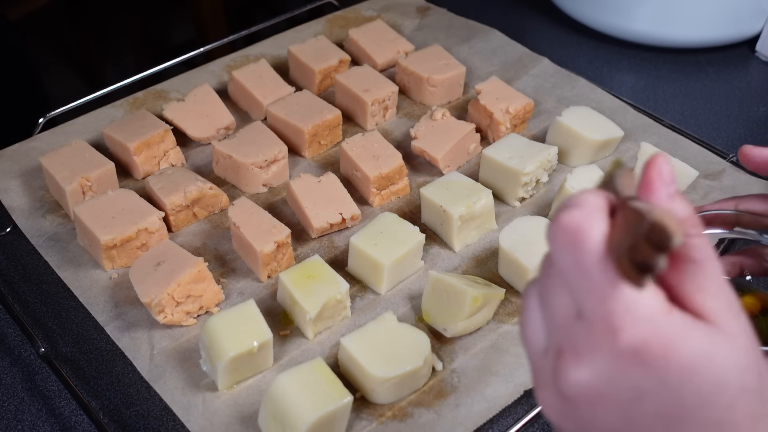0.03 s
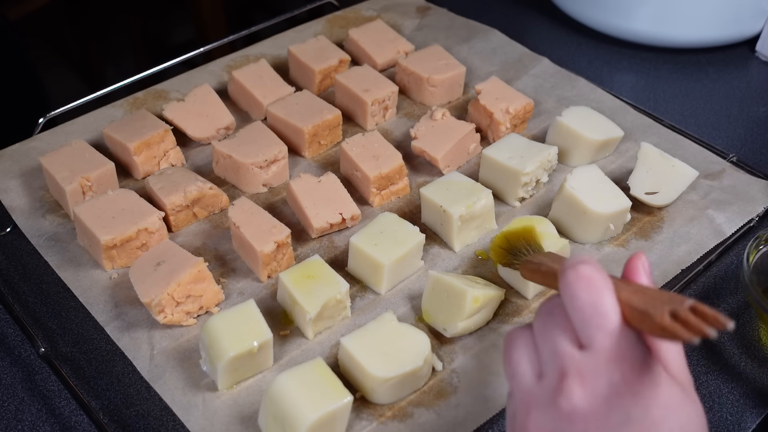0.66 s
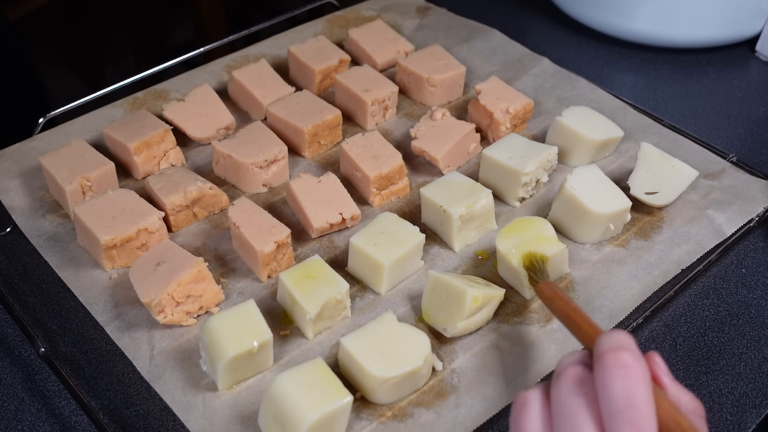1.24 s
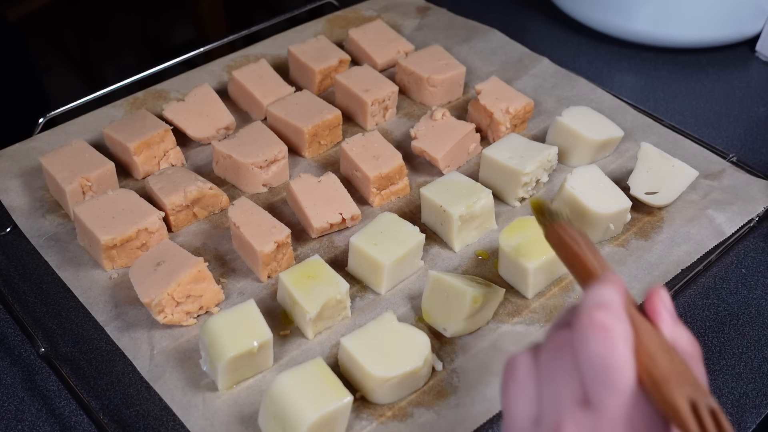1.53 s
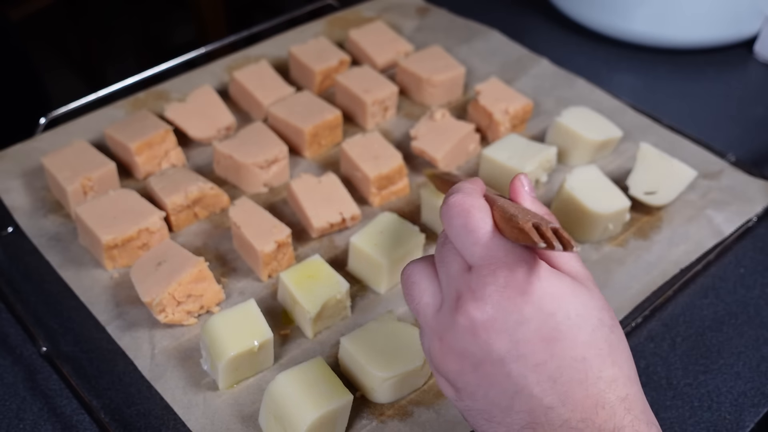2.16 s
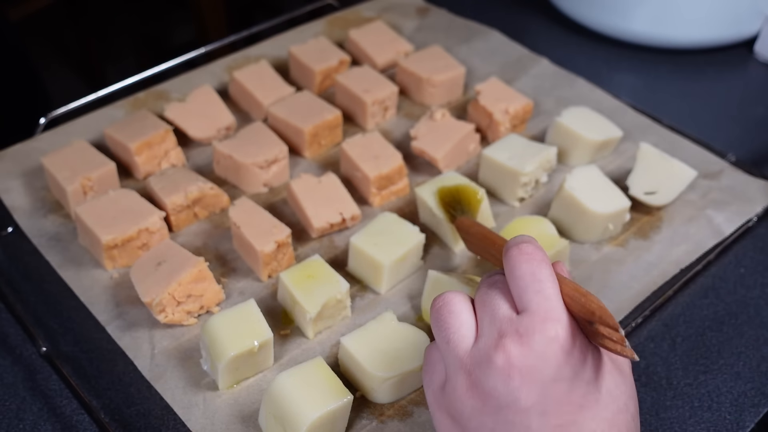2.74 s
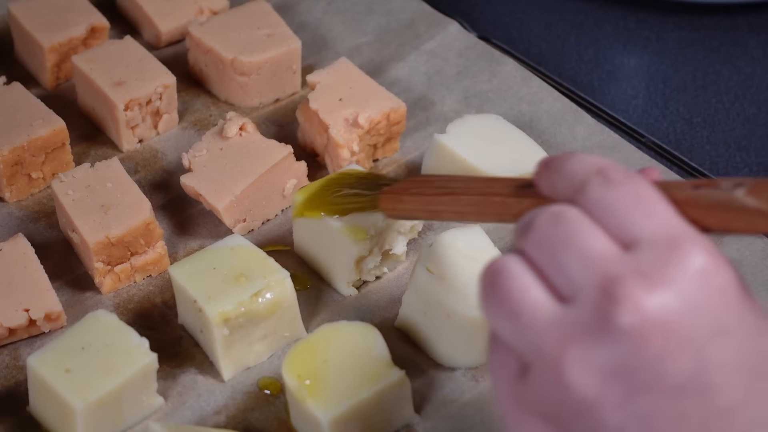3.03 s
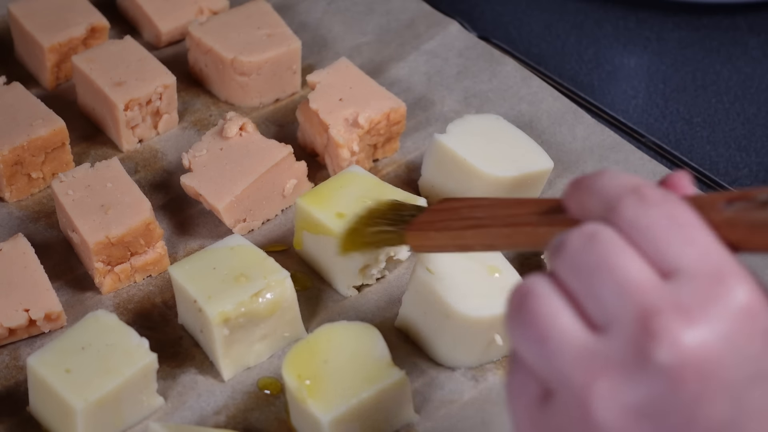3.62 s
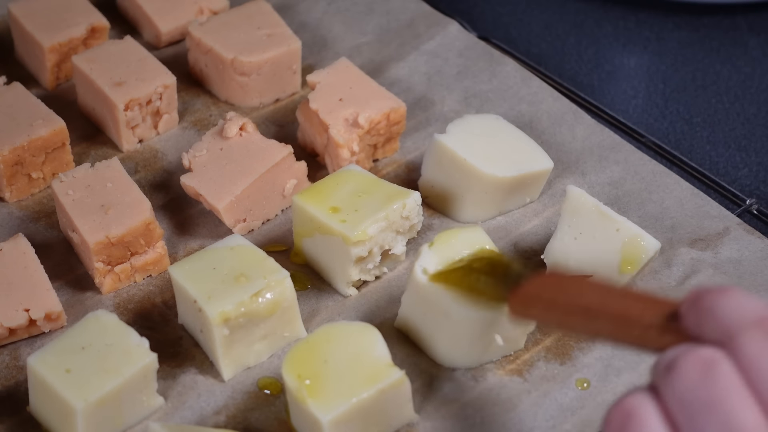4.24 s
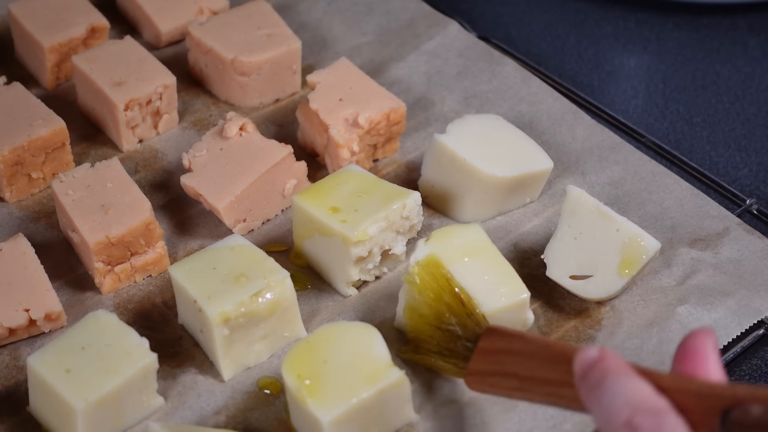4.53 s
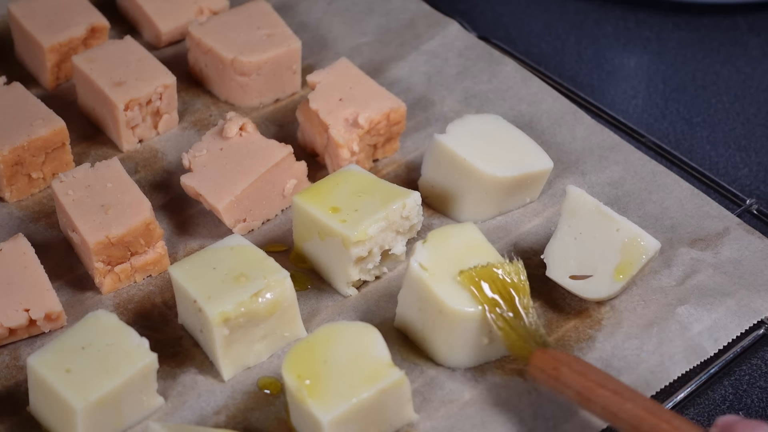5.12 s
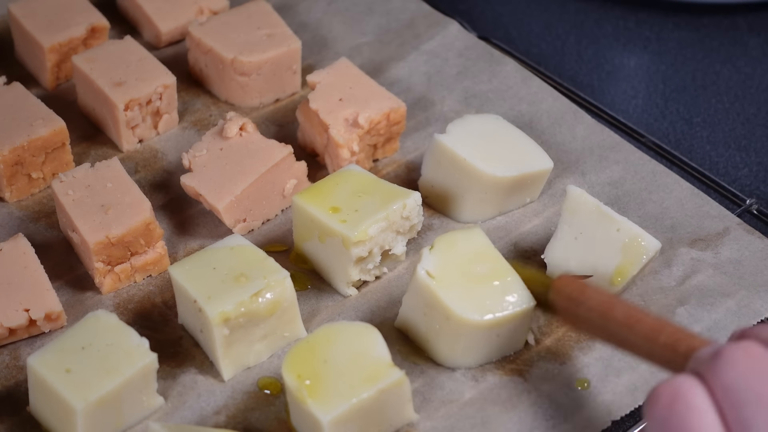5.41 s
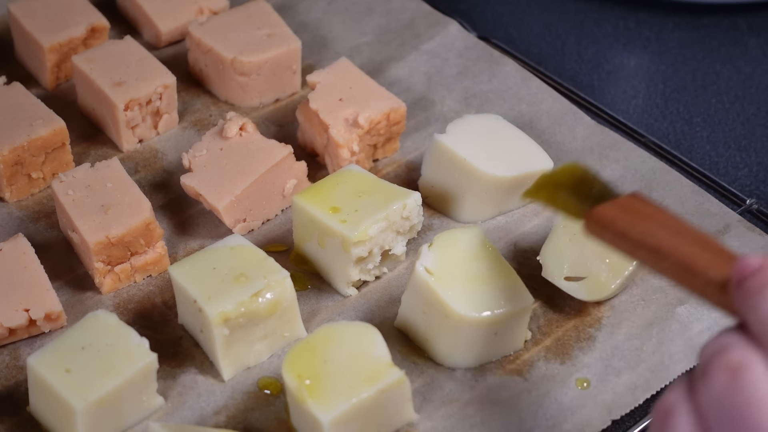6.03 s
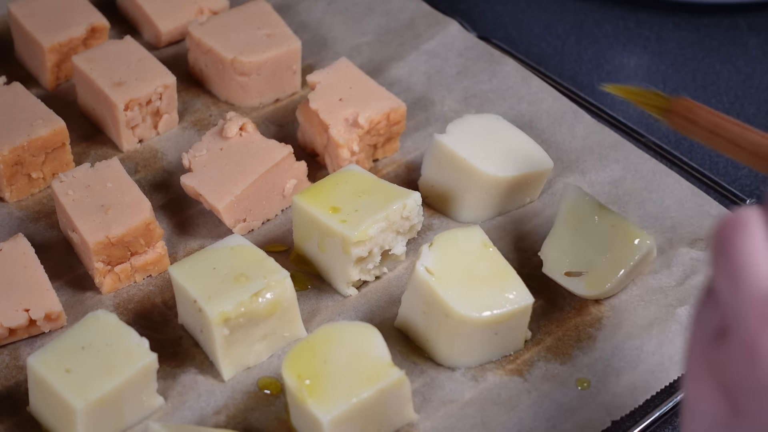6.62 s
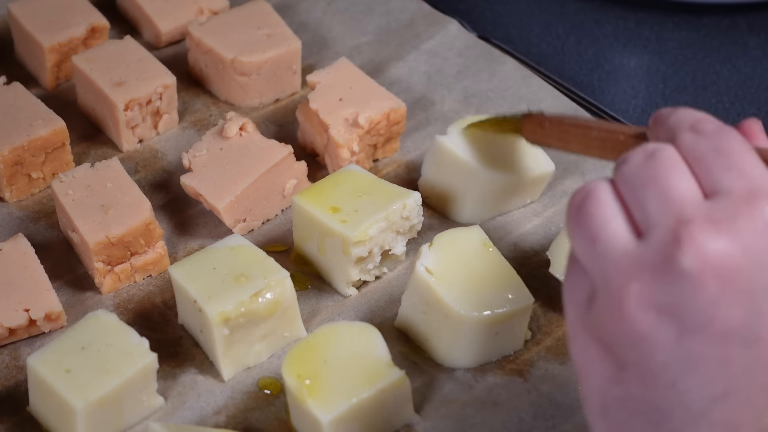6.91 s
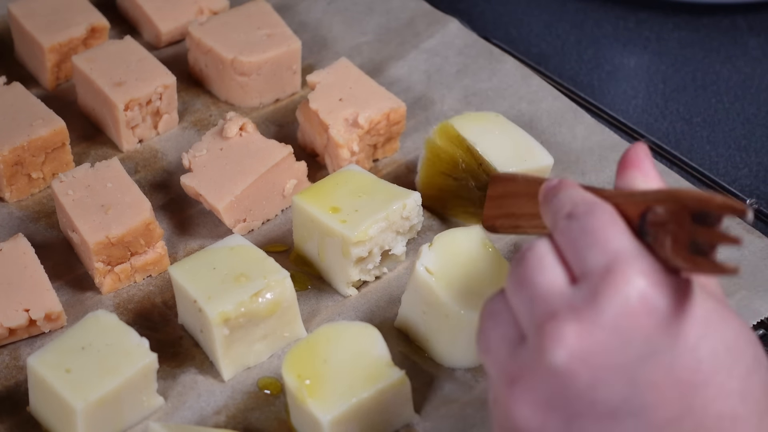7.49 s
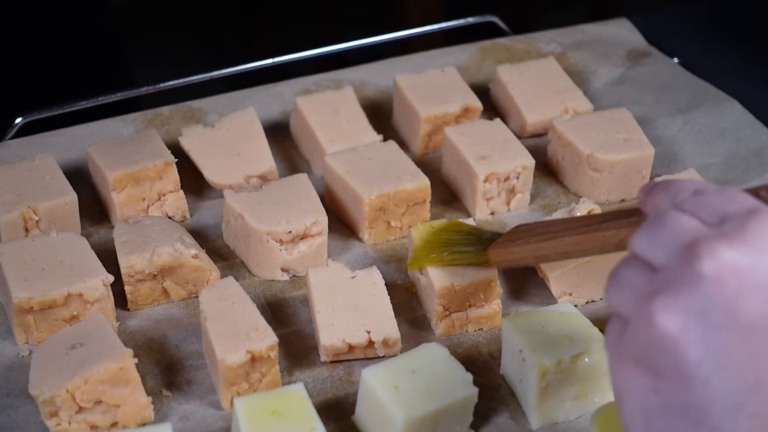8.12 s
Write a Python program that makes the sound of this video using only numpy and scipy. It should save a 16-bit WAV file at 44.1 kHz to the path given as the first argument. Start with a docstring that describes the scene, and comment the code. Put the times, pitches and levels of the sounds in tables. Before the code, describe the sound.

A pastry brush dabs oil onto soft cubes on crinkling baking parchment, after two hollow knocks in a quiet kitchen.

```python
"""Oiling cubes on baking parchment

Close by in a quiet kitchen, a pastry brush dabs oil onto soft cubes, its bristles rustling in short
strokes. The parchment buckles in dry snaps and ticks faintly as it settles. Early on something hollow,
perhaps a drawer, knocks twice and rolls to rest. Worktop and walls answer briefly."""
import sys
import numpy as np
from scipy import signal
from scipy.fft import rfft, irfft, next_fast_len
from scipy.io import wavfile
from scipy.ndimage import map_coordinates

SR = 44100
rng = np.random.default_rng(int(sys.argv[2]) if len(sys.argv) > 2 else 0)


def master_out(mix):
    """Clip the mix to full scale and print it as 16-bit PCM to the path in sys.argv[1]."""
    frames = np.transpose(np.atleast_2d(mix))
    ceiling = np.clip(frames, -1, 1)
    pcm = np.round(ceiling * 32767).astype(np.int16)
    wavfile.write(sys.argv[1], SR, pcm)


N = 368235

# brush strokes: t/s, press/s, drag/s, relative level/dB, firmness/dB (paper rustle over bristle hiss)
STROKES = [(4.548, 0.054, 0.071, -38.5, 0.5), (4.857, 0.016, 0.1, -43.5, -9),
           (5.102, 0.0146, 0.069, -43, -14), (5.345, 0.0084, 0, -37.5, -6),
           (5.364, 0.032, 0.19, -37.5, 4.5), (5.816, 0.017, 0, -46.5, 3), (5.856, .052, 0, -42.5, 10),
           (5.959, .024, .02, -39, 22), (6.218, .015, 0, -47, 4), (6.345, 0.017, 0.044, -49, -4),
           (6.45, 0.032, 0.098, -42, -4.5), (6.824, .075, 0.106, -43, 9.5), (7.057, 0.015, 0, -39.5, 26),
           (7.138, .022, 0.071, -43.5, 18), (7.264, 0.033, 0.023, -39.5, -3.5), (7.542, .04, .06, -44.5, 1),
           (7.9, .03, 0.036, -39, -1)]
# spells in which the oily paper settles: t/s, length/s, relative level/dB
SETTLING = [(0.202, 1.06, -65), (1.9, 0.63, -67), (2.819, 0.14, -64.5), (3.85, 0.32, -67.5),
            (4.245, 3.8, -71), (8.095, 0.24, -69.5)]
# knocks of the drawer, then a soft one on the worktop: t/s, relative level/dB, f/Hz, crack/dB
KNOCKS = [(1.2142, -28, 1030, -9.5), (1.2267, -31.5, 1010, -17), (1.5843, -24.5, 1335, -37),
          (3.1365, -58, 550, -28)]
# tone colours: f/Hz, level/dB
PAPER_EQ = [(60, -71), (200, -48.5), (400, -15.5), (800, -11.5), (1300, -1.5), (2200, 2.5), (3400, -1),
            (4800, -3), (6500, -12.5), (15000, -51.5)]  # crackling parchment
BRISTLE_EQ = [(100, -92), (1500, -14.5), (4000, 2.5), (6000, 0), (10000, -2), (13000, -6.5), (16000, -14.5)]  # bristle hiss
RASP_EQ = [(60, -57), (250, -44), (550, -5.5), (1200, -2), (2200, 4.5), (3200, 3), (4700, -0.5), (6500, -9),
           (15000, -27)]  # bristles rubbing on paper
RATTLE_EQ = [(70, -44), (200, -49), (550, 7), (850, -1), (1050, 3.5), (1450, 5), (1900, -0.5), (2300, -10),
             (2800, -9), (3600, -24.5), (6000, -27), (15000, -62)]  # the drawer's contents


def brush(rise_s=0.0073, release_s=0.015, lift_s=0.0074, sag_db=3, drag_db=-13.5, trim_db=-1):
    """Bristles scrape the paper: each stroke presses hardest as it lands, trails lightly and lifts."""
    out, t = np.zeros(N), np.arange(SR // 4) / SR
    for s, press_s, drag_s, db, firmness_db in STROKES:
        sag = amp(sag_db * (0.5 - 2 * np.minimum(t / press_s, 1)))
        press = held(t, rise_s, press_s, release_s) * sag
        drag = amp(drag_db) * held(t, rise_s, press_s + drag_s, lift_s)
        catching = amp(wobble(per_s=138.6, depth_db=2, size=len(t)))  # tufts catch and slip
        touch = np.maximum(press, drag) * catching
        low_cut_hz = max(570, 960 * 2 ** (-firmness_db / 8))  # a firmer stroke reaches lower
        rasp = coloured(grains(2600, scatter_db=6.5, size=len(t)), RASP_EQ)
        rustle = unit(low_cut(rasp, low_cut_hz))
        hiss = unit(coloured(grains(6000, scatter_db=8.5, size=len(t)), BRISTLE_EQ))
        rustle_db, hiss_db = rustle_and_hiss(db + trim_db, firmness_db)
        add(out, s, touch * (amp(rustle_db) * rustle + amp(hiss_db) * hiss))
    return out


def rustle_and_hiss(db, firmness_db):
    """A stroke's power splits between paper rustle and bristle hiss, both in dB."""
    hiss_db = db - 10 * np.log10(1 + amp(firmness_db) ** 2)
    return hiss_db + firmness_db, hiss_db


def crease(db, hz, treble_db, trim_db=-8.5, crackle_db=-3, size=1024):
    """A crease flips: a patch of the sheet swings for a few cycles, with a crackle and a bright edge."""
    t = np.arange(size) / SR
    onset = 1 - np.exp(-t / 0.00063)
    decay = lambda t60: amp(-60 * t / t60) * onset
    flip = unit(np.sin(2 * np.pi * hz * t) * decay(t60=0.0022))
    patch_eq = np.array(PAPER_EQ) * [hz / 2500, 1]  # a smaller patch crackles higher
    crackle = unit(coloured(rng.standard_normal(size) * decay(t60=0.014), patch_eq))
    edge = unit(coloured(toneless(decay(t60=0.0075)), BRISTLE_EQ))
    body = unit(flip + amp(crackle_db) * crackle)
    return amp(db + trim_db) * low_cut(body + amp(treble_db) * edge, hz=750)


def snaps():
    """The parchment buckles, one dry snap at a time."""
    # creases at set times: t/s, relative level/dB, f/Hz, treble/dB
    buckles = [(0.408, -50.5, 3080, -9.5), (0.4416, -53.5, 1930, -17), (0.5858, -45.5, 2100, -10),
               (0.633, -50.5, 3050, -5.5), (0.7557, -51.5, 2230, -22), (1.0836, -50.5, 2040, -10),
               (1.135, -53.5, 3250, -5), (1.164, -53, 2500, -8), (1.5618, -37.5, 2230, -12.5),
               (1.867, -32.5, 2370, -4), (1.9091, -30.5, 2040, -10), (2.0378, -44.5, 2000, -31),
               (2.11, -42.5, 2960, -17), (2.361, -39.5, 2180, -23), (2.382, -41.5, 1980, -12),
               (3.1369, -52, 1750, -25), (3.6098, -52.5, 3550, -12), (3.9398, -44, 1890, -15),
               (3.9644, -43.5, 2800, -7.5), (4.323, -39.5, 2460, -35), (4.4001, -41.5, 2410, -18),
               (4.6828, -35.5, 2670, 1.5), (5.1071, -40.5, 3280, 1.5), (5.3038, -64.5, 4950, 11),
               (5.3723, -22.5, 3400, -15), (5.4085, -34.5, 2270, -8.5), (5.4688, -24.5, 2810, -9.5),
               (5.8301, -36, 2680, -3.5), (5.8568, -34.5, 2940, -12), (5.8876, -33.5, 2400, -13),
               (5.896, -35.5, 2250, 0.5), (5.946, -31.5, 2630, -4.5), (5.963, -31, 4600, 0),
               (5.9931, -36, 2440, -22), (6.0722, -42, 2550, -36), (6.2271, -42.5, 2800, -12),
               (6.3115, -44.5, 2320, -37), (6.367, -46.5, 2080, -24), (6.4422, -44.5, 2260, -11),
               (6.8279, -29.5, 2830, -7.5), (6.8484, -33, 1830, -17), (6.8879, -34.5, 1970, -29),
               (6.925, -28.5, 2240, -7.5), (6.9756, -34.5, 2450, -4.5), (7.025, -37.5, 2660, -8),
               (7.065, -31.5, 2480, -13), (7.0933, -35.5, 2270, -15), (7.1375, -32, 2260, -13.5),
               (7.147, -33.5, 3320, -18), (7.1574, -38.5, 2670, 0), (7.1977, -39.5, 3200, -9),
               (7.308, -34, 2450, -13), (7.39, -35, 2320, -15), (7.622, -35, 2040, -12),
               (7.663, -40.5, 2560, -3.5), (7.6943, -41.5, 3400, -5.5), (8.2339, -58, 3470, 5.5)]
    out = np.zeros(N)
    for s, db, hz, treble_db in buckles:
        add(out, s, crease(db, hz, treble_db))
    return out


def random_creases(crinkles_per_s=35, pops_per_s=8, scatter_db=5, centre_hz=2400, octaves=0.48):
    """Further creases flip at random times: crinkles under each press, pops while the paper settles."""
    crinkles = [(s, press_s, rustle_and_hiss(db, firmness_db)[0] + 1, crinkles_per_s)
                for s, press_s, _, db, firmness_db in STROKES]
    pops = [(s, length_s, db + 7.5, pops_per_s) for s, length_s, db in SETTLING]
    out = np.zeros(N)
    for s, length_s, db, per_s in crinkles + pops:
        count = round(length_s * per_s)
        for k, (jitter, softness, pitch) in enumerate(rng.uniform(-1, 1, (count, 3))):
            sound = crease(db - scatter_db * softness, centre_hz * 2 ** (octaves * pitch), treble_db=-4)
            add(out, s + length_s * (k + (1 + jitter) / 2) / count, sound)
    return out


def ticks(trim_db=-3, rise_s=0.05, release_s=0.04):
    """The oily paper keeps settling in faint ticks."""
    t = np.arange(N) / SR
    stir = sum(amp(db) * held(t - s, rise_s, length_s, release_s) for s, length_s, db in SETTLING)
    return amp(trim_db) * stir * unit(coloured(grains(75, scatter_db=4), PAPER_EQ))


def drawer(start_s=1.214, slows_s=1.463, rest_s=1.8, gather_db_per_s=19, slowing_db_per_s=32):
    """Rollers rumble over bumps and the runner rings; knocks add to the box's boom and the rattle."""
    # rumble of the rollers: f/Hz, level/dB
    rumble_eq = [(60, -61), (140, -48), (200, -15), (300, -5), (380, -2.5), (440, 3.5), (520, -3.5),
                 (800, -8.5), (3000, -41.5)]
    # resonances of the box panels and the steel runner: f/Hz, width/Hz, level/dB
    panel_modes = [(436, 27, -17), (586, 63, 0.5), (636, 44, 3.5), (722, 19, 0), (803, 24, -8),
                   (823, 140, -14.5)]
    runner_modes = [(5330, 250, -23), (9800, 79, -20), (14600, 150, -43)]
    # the bumps that drive the panels: f/Hz, level/dB
    drive_eq = [(100, -30), (450, -13.5), (850, 2.0), (2500, -13.5)]
    t = np.arange(N) / SR
    moving = held(t - start_s, rise_s=0.0021, hold_s=rest_s - start_s, release_s=0.038)
    speed_db = np.minimum(gather_db_per_s * (t - slows_s), slowing_db_per_s * (slows_s - t))
    rolling = amp(speed_db + wobble(per_s=35, depth_db=2.5))  # the rollers run unevenly
    boom = np.hypot(amp(-50), amp(-10.5) * shaking(t, db_per_s=92))
    jostle = np.hypot(amp(-54) * rolling, amp(-11) * shaking(t, db_per_s=118))
    bumps = lambda eq: unit(coloured(grains(2500, scatter_db=5), eq))
    rumble = amp(-45.5) * rolling * bumps(rumble_eq)
    panels = boom * resonant(bumps(drive_eq), panel_modes)
    rattle = jostle * bumps(RATTLE_EQ)
    ring = amp(-72) * resonant(grains(440, scatter_db=6), runner_modes)
    return low_cut(moving * (rumble + panels + rattle + ring), hz=195)


def knocks(contact_s=0.00064, clatter_db=-5, trim_db=-10):
    """Each hollow knock is a short push on the box, a clatter and a thin crack."""
    out, t = np.zeros(N), np.arange(SR // 20) / SR
    burst = lambda eq, t60: unit(coloured(rng.standard_normal(len(t)) * amp(-60 * t / t60), eq))
    for s, db, hz, crack_db in KNOCKS:
        push = unit(np.sin(2 * np.pi * hz * t) * t ** 2 * np.exp(-t / contact_s))
        clatter = amp(clatter_db) * burst(RATTLE_EQ, t60=0.083)
        crack = amp(crack_db) * burst(RASP_EQ, t60=0.015)
        add(out, s, amp(db + trim_db) * (push + clatter + crack))
    return low_cut(out, hz=260)


def shaking(t, db_per_s):
    """Every knock shakes the drawer in proportion to its strength; the shaking dies away."""
    return np.sqrt(sum((t > s) * amp(db - db_per_s * np.abs(t - s)) ** 2 for s, db, *_ in KNOCKS))


def thud(gain_db=-53, top_hz=130):
    """The cabinet takes up each knock as a faint low thud."""
    lows = filtered(rng.standard_normal(N), lambda hz: 1 / (1 + (hz / top_hz) ** 4))
    return amp(gain_db) * shaking(np.arange(N) / SR, db_per_s=110) * unit(low_cut(lows, hz=60))


def kitchen(x, wet_db, worktop_s=0.0061, worktop_db=-15, size=16384):
    """The worktop throws back one quick reflection; the walls add a short tail that keeps shifting."""
    # decay of the room: f/Hz, t60/s
    decay_times = [(300, 0.63), (1000, 0.6), (2800, .46), (7000, 0.61), (15000, 0.36)]
    # stereo image of the tail: f/Hz, left-right likeness
    likeness = [(300, 0.98), (1000, 0.69), (3000, 0.55), (10000, 0.4)]
    near = x.copy()
    add(near, worktop_s, amp(worktop_db) * x)
    walls = np.zeros((2, N))
    for start in range(0, N, size // 2):
        piece = x[start:start + size]
        piece = piece * np.sin(np.pi * np.arange(len(piece)) / size)  # crossfade into a fresh tail
        hz, t, noise = signal.stft(rng.standard_normal((2, SR // 3)), SR, nperseg=256)
        decay = amp(-60 * t / along(decay_times, hz)[:, None])
        onset = np.minimum(t / 0.0017, 1)
        tail = signal.istft(noise * decay * onset, SR, nperseg=256)[1]
        reverb = signal.fftconvolve(piece[None], tail / np.linalg.norm(tail[0]), axes=1)
        for side, sound in zip(walls, reverb):
            add(side, start / SR, sound)
    return near + amp(wet_db) * spread(walls, likeness)


def room_tone(level_db=-62.5):
    """The steady hush of the still kitchen."""
    # colour of the hush: f/Hz, relative level/dB
    hush_eq = [(25, -38), (48, -21), (75, -29.5), (120, -20.5), (180, -14), (260, -18.5), (450, -9.5),
               (750, -2.5), (1150, -7.5), (1700, -4.5), (3000, -8), (5000, -11.5), (8000, -16.5),
               (16000, -20.5)]
    # its stereo image: f/Hz, left-right likeness
    likeness = [(60, 0.96), (180, 0.81), (550, 0.3), (1650, 0.019), (4970, 0.062), (15000, 0.61)]
    noise = filtered(rng.standard_normal((2, N)), lambda hz: amp(along(hush_eq, hz)))
    return amp(level_db) * unit(spread(noise, likeness))


def amp(db):
    """Decibels to gain."""
    return 10 ** (np.asarray(db) / 20)


def unit(x):
    """Scale to rms 1."""
    return x / np.sqrt(np.mean(x ** 2) + 1e-20)


def along(points, hz):
    """Read (f/Hz, value) points on a log frequency axis."""
    f, values = np.transpose(points)
    return np.interp(np.log(hz + 1), np.log(f + 1), values)


def add(track, s, sound):
    """Mix a sound into the track at s seconds."""
    part = track[round(s * SR):][:len(sound)]
    part += sound[:len(part)]


def held(t, rise_s, hold_s, release_s):
    """An envelope that rises, holds and dies away."""
    return np.clip(t / rise_s, 0, 1) * np.exp(-np.maximum(t - hold_s, 0) / release_s)


def wobble(per_s, depth_db, size=N):
    """A level in dB that glides between random values."""
    knots = rng.standard_normal(int(size * per_s / SR) + 4)
    return depth_db * np.clip(map_coordinates(knots, [np.arange(size) * per_s / SR]), -2, 2)


def grains(per_s, scatter_db, size=N):
    """Tiny impulses at random times, of scattered strength."""
    strength = amp(scatter_db * np.clip(rng.standard_normal(size), -2, 2))
    polarity = rng.choice([-1, 1], size)
    return strength * polarity * (rng.random(size) < per_s / SR)


def toneless(envelope):
    """A noise burst with an even spectrum, so that no pitch sticks out."""
    spectrum = rfft(rng.standard_normal(len(envelope)) * envelope)
    return irfft(spectrum / (np.abs(spectrum) + 1e-12)) * np.sqrt(envelope)


def filtered(x, response):
    """Shape x with a gain that depends on frequency."""
    n = x.shape[-1]
    padded = next_fast_len(n + 4096)
    return irfft(rfft(x, padded) * response(np.fft.rfftfreq(padded, 1 / SR)), padded)[..., :n]


def coloured(x, eq, size=1024):
    """Minimum-phase EQ: nothing rings ahead of an attack."""
    cepstrum = irfft(np.log(amp(along(eq, np.fft.rfftfreq(size, 1 / SR)))))
    cepstrum[1:size // 2] *= 2
    cepstrum[size // 2 + 1:] = 0
    return signal.fftconvolve(x, irfft(np.exp(rfft(cepstrum))))[:len(x)]


def low_cut(x, hz):
    """A small radiator gives off little below hz."""
    return signal.sosfilt(signal.butter(2, hz, "high", fs=SR, output="sos"), x)


def resonant(x, modes):
    """Ring x through (f/Hz, width/Hz, level/dB) resonances, scaled to rms 1."""
    peak = lambda f, hz, width: 1j * f * width / (hz * hz - f * f + 1j * f * width)
    return unit(filtered(x, lambda f: sum(amp(db) * peak(f, hz, width) for hz, width, db in modes)))


def spread(pair, likeness):
    """Mix two unrelated signals to a left and right of the given likeness."""
    angle = lambda hz: np.arccos(np.clip(along(likeness, hz), -1, 1)) / 2
    mid, side = filtered(pair, lambda hz: np.array([np.cos(angle(hz)), np.sin(angle(hz))]))
    return np.array([mid + side, mid - side])


def scene():
    """The tray lies close and slightly to the right; the drawer is farther off, with more room on it."""
    background = kitchen(drawer() + knocks() + thud(), wet_db=-4.5) + room_tone()
    tray = kitchen(snaps() + brush() + ticks() + random_creases(), wet_db=-7.5)
    return tray * amp([[-0.6], [0.6]]) + background


def record(dry):
    """A brick-wall high cut at 15.9 kHz."""
    return filtered(dry, lambda hz: hz < 15900)


dry = scene()
out = record(dry)
master_out(out)
```